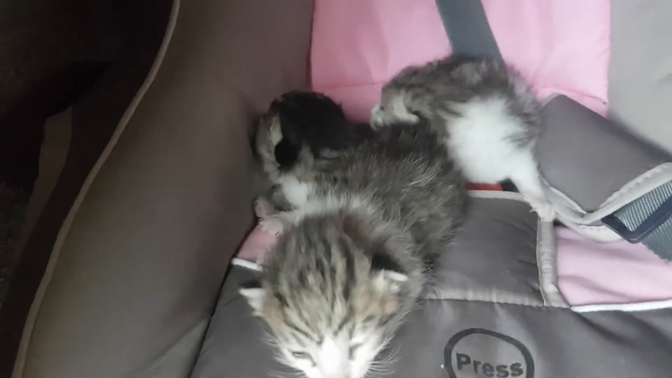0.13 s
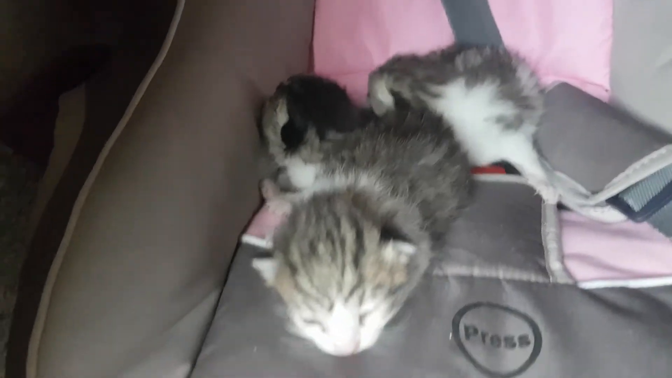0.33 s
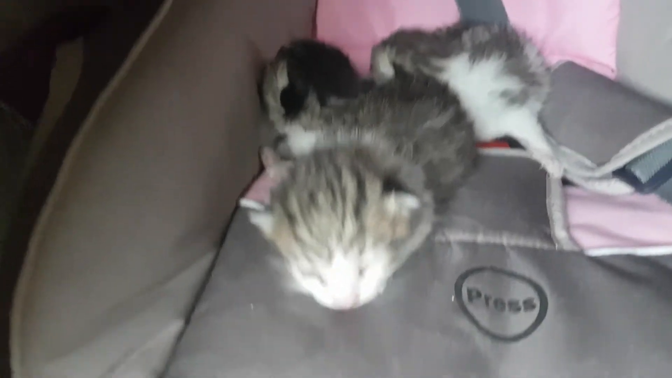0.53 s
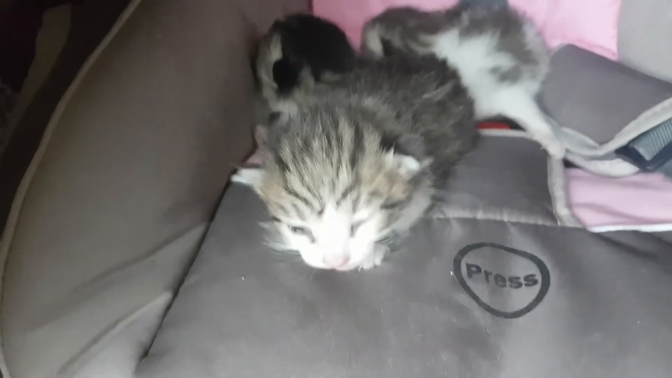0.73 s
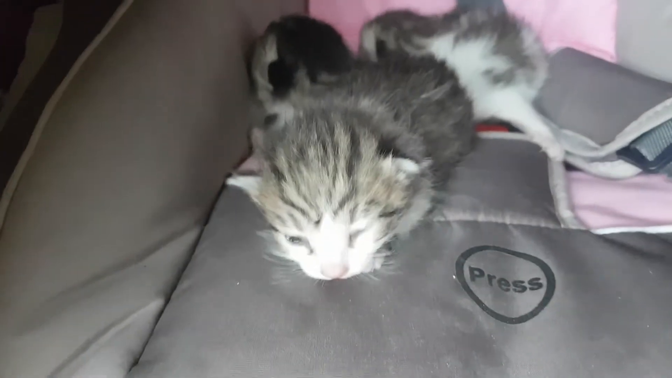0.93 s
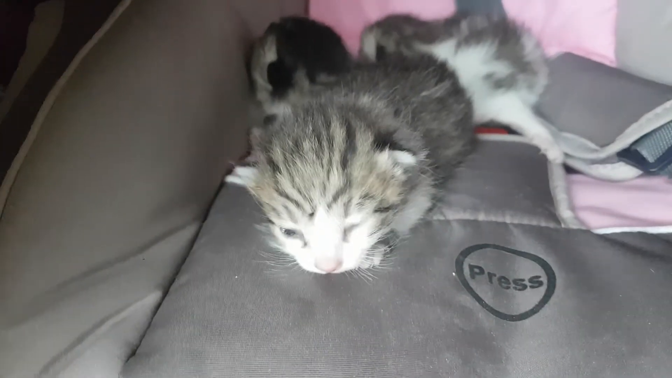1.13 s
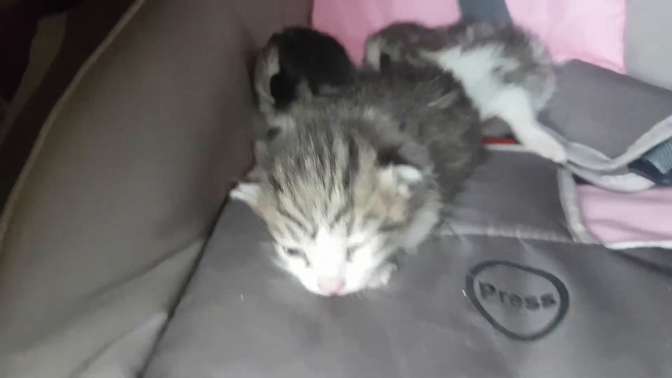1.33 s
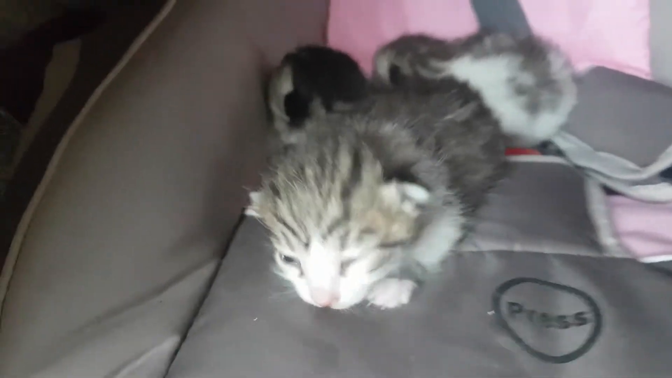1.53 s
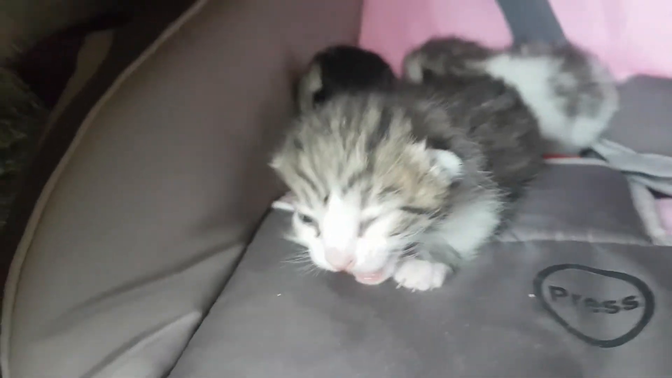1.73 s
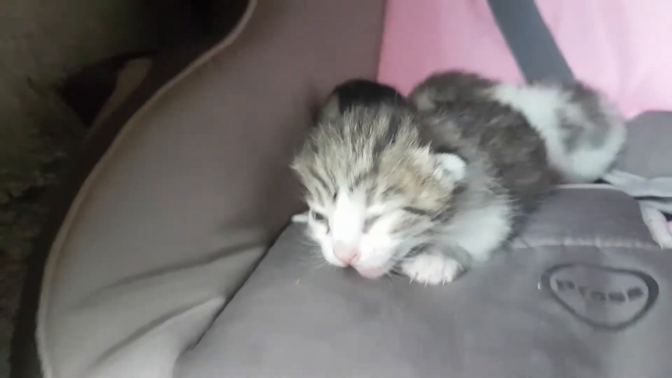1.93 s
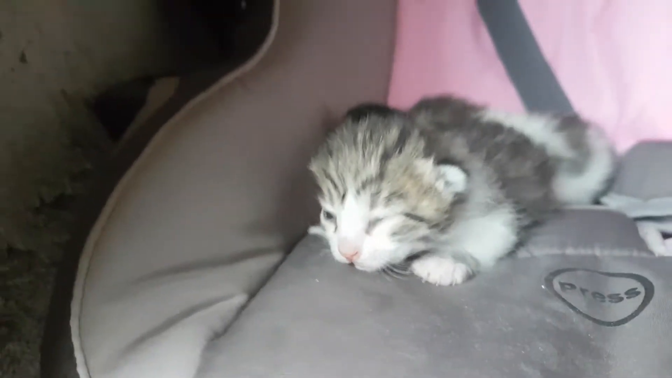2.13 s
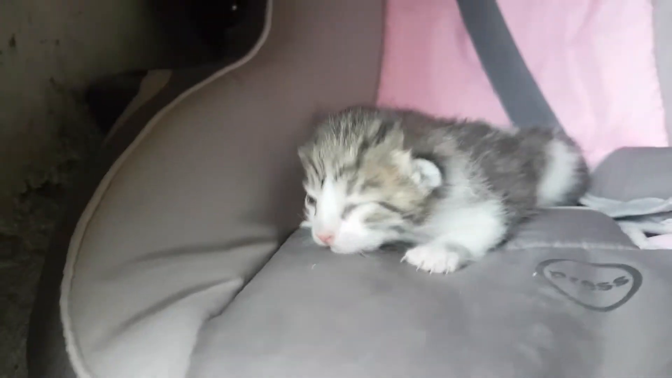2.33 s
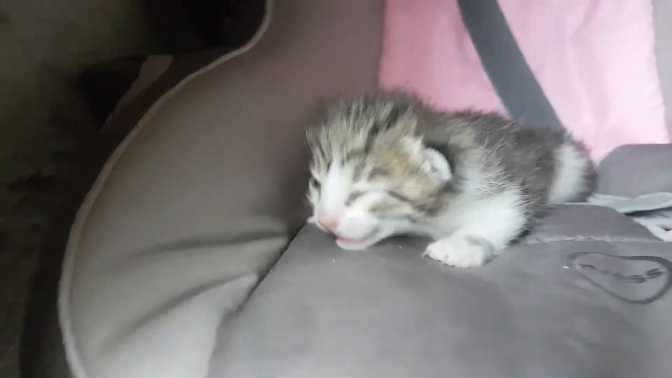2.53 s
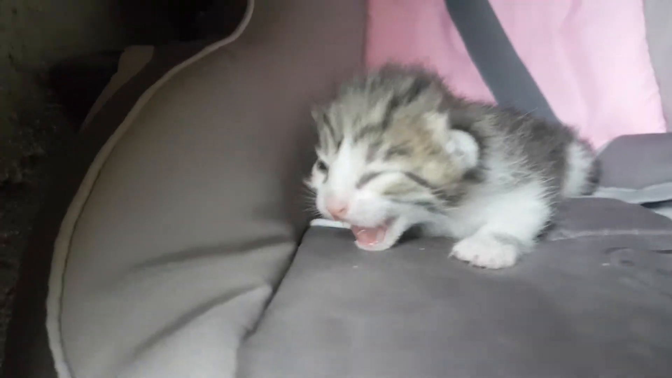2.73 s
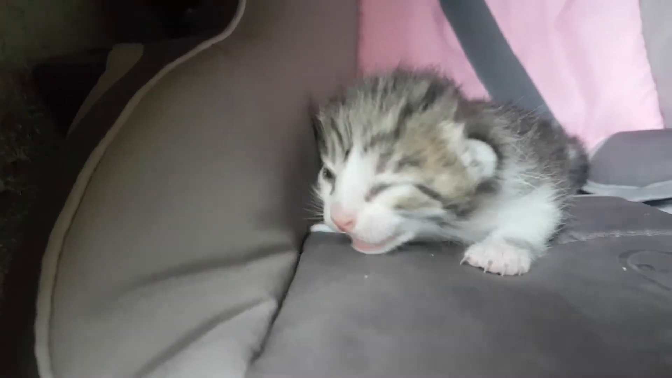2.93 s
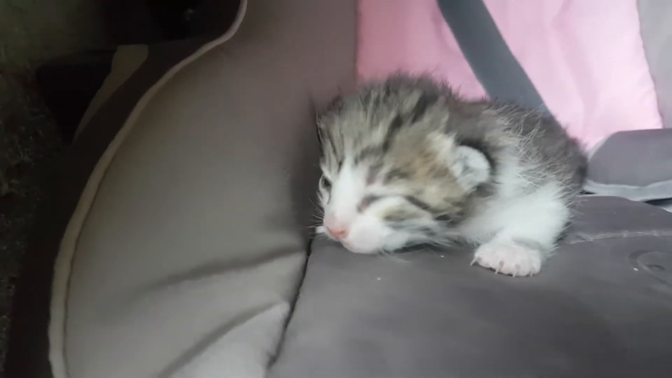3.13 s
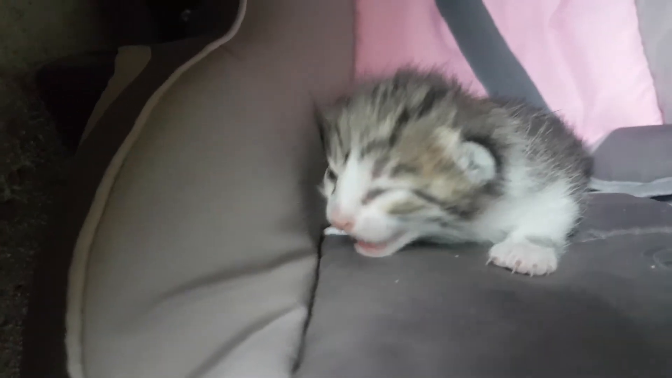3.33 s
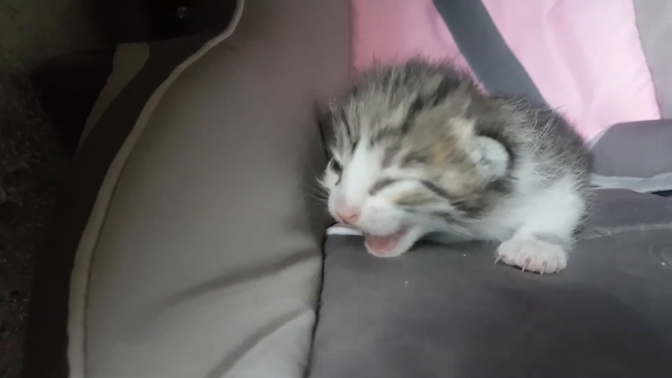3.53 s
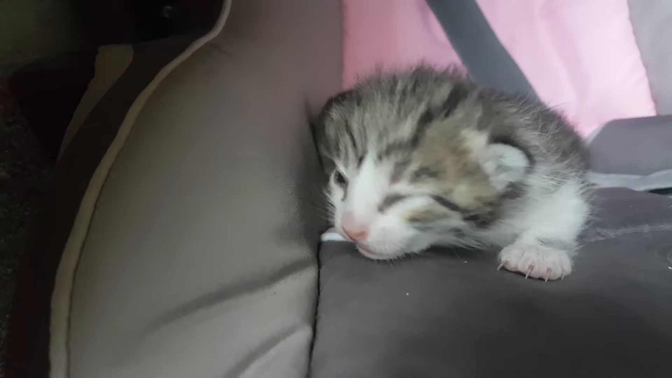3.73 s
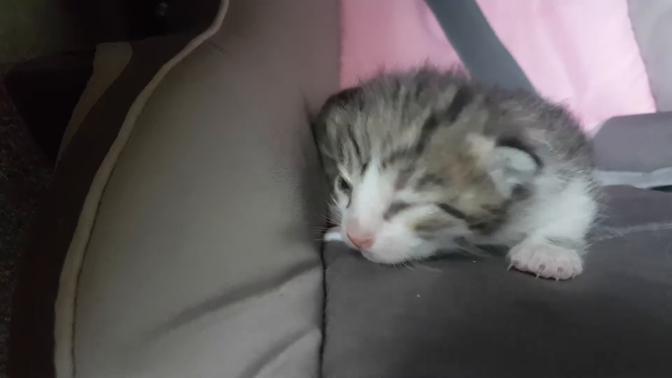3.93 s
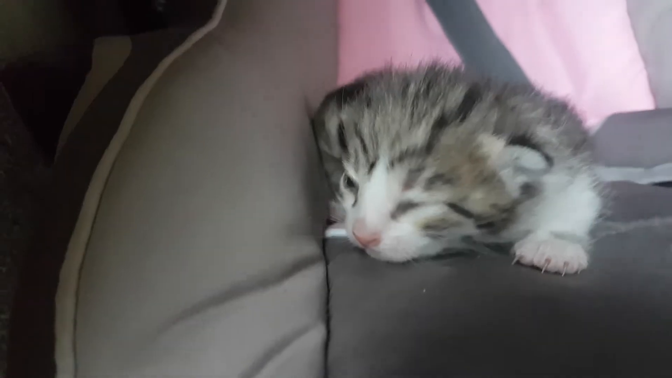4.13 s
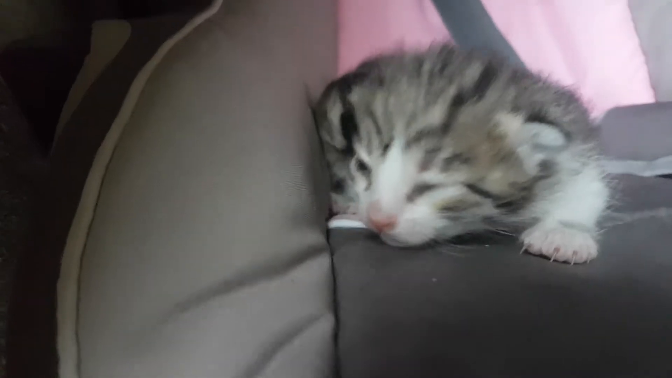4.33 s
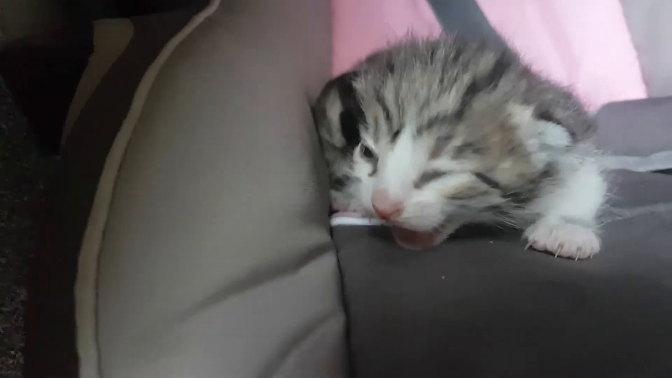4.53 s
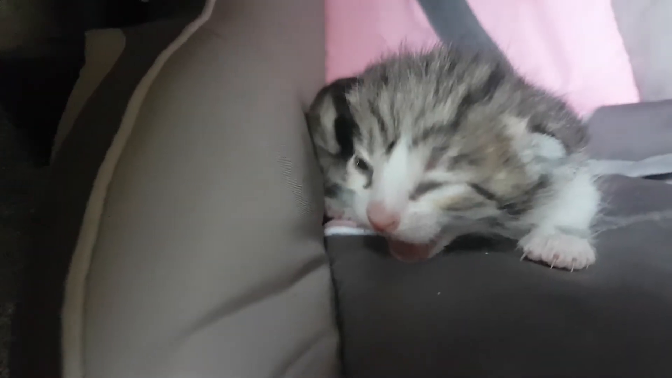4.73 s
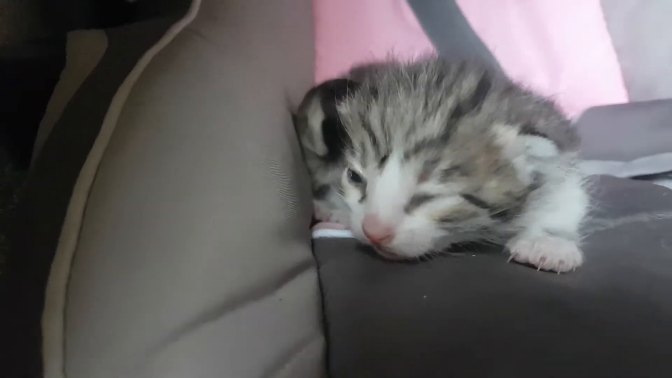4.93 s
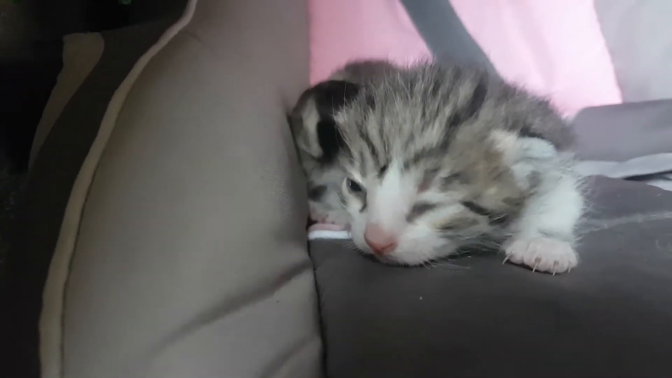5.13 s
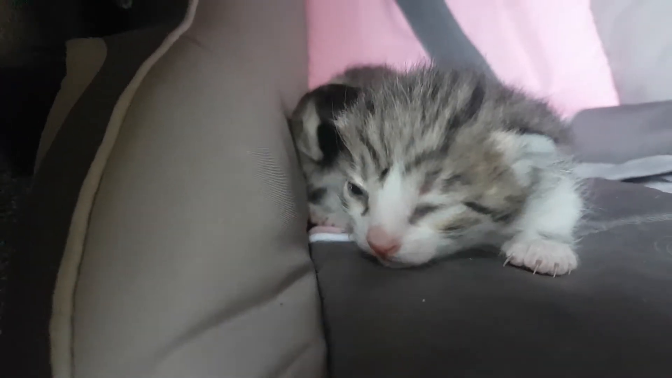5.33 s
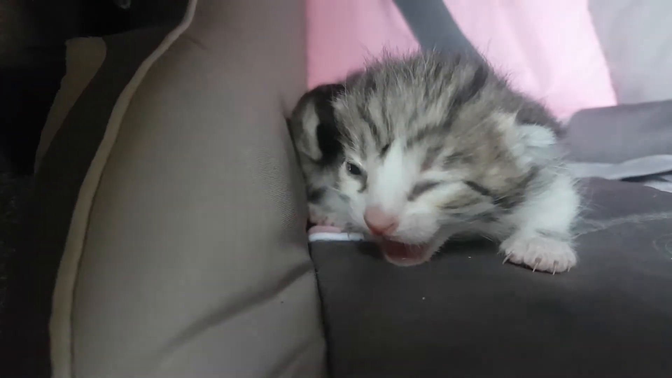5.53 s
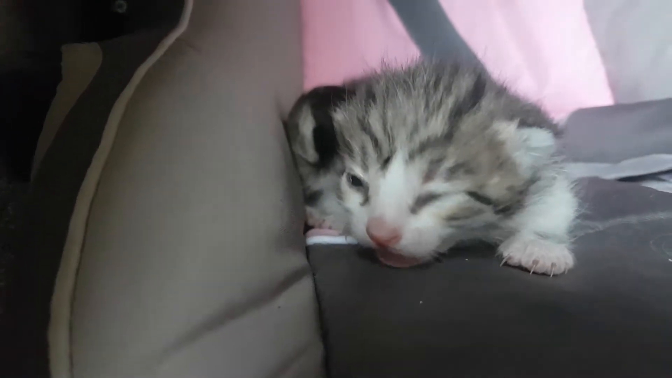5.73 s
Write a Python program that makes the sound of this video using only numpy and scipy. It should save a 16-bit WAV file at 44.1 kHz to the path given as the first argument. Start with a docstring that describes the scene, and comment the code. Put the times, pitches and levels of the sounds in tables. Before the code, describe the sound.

A newborn kitten close by gives six piercing, squeaky mews about a second apart, while fainter littermates answer behind in a quiet room.

```python
"""A newborn kitten mews close to a phone: a thin rise, a break of register, a bright falling cry.
Each cry is a stack of harmonics with air noise riding on it; litter mates answer the same way behind it.
Sines add a brief half-pitch tone of the kitten's voice, strongest at its 3rd harmonic, and faint steady
tones. Noise clicks make smacking lips and claws, a pressure step is one finger tap on the left port.
The half covered right port is shaded and late; shaped noise makes the quiet room."""
import sys
import numpy as np
from scipy import signal
from scipy.fft import rfft, irfft, next_fast_len
from scipy.io import wavfile
from scipy.ndimage import uniform_filter1d, map_coordinates

SR = 44100
rng = np.random.default_rng(int(sys.argv[2]) if len(sys.argv) > 2 else 0)


def store_pcm(level_fs):
    """Save levels as 16-bit WAV."""
    pcm = np.round(np.clip(level_fs, -1, 1) * 32767).astype(np.int16)
    wavfile.write(sys.argv[1], SR, np.atleast_2d(pcm).T)


N = 259308
TOP_HZ = 15850  # band limit of the phone


def amp(db):
    """Gain of a dB value."""
    return 10 ** (np.asarray(db) / 20)


def unit(x):
    """x at rms 1."""
    return x / np.sqrt(np.mean(x ** 2) + 1e-20)


def ramp(x):
    """x held between 0 and 1."""
    return np.clip(x, 0, 1)


def along(points, hz):
    """Interpolate (Hz, value) points on a log frequency axis."""
    f, v = np.transpose(points)
    return np.interp(np.log(hz + 1), np.log(f + 1), v)


def wobble(rate, size=N):
    """A smooth random curve, rate knots a second."""
    knots = rng.standard_normal(int(size * rate / SR) + 4)
    return map_coordinates(knots, [np.arange(size) * rate / SR])


def filtered(x, response):
    """x times a complex response of frequency."""
    m = next_fast_len(N + SR // 2)
    return irfft(rfft(x, m) * response(np.fft.rfftfreq(m, 1 / SR)), m)[..., :N]


# Near cries, one list a cry. Each row: time in seconds, pitch in Hz, fundamental in dB,
# mouth opening as 2nd harmonic over fundamental in dB.
NEAR_CRIES = [
    [(.549, 965, -52.5, -33), (.575, 1421, -35.5, -27), (.593, 1694, -44, -4), (.615, 1957, -38.5, 7.5),
     (.62, 2269, -27, -26), (.644, 2210, -29, -10.5), (.651, 1680, -35, 19), (.673, 1684, -29, 12.5),
     (.684, 1621, -29, 18), (.769, 1498, -24.5, 9.5), (.81, 1436, -28.5, 0.5), (.843, 1429, -34.5, 1.5),
     (.87, 1340, -42, 19), (.911, 904, -51, -15)],
    [(1.553, 915, -53, -10), (1.595, 1332, -39.5, -32.5), (1.625, 1594, -38.5, -4), (1.648, 1602, -34.5, 4),
     (1.661, 1482, -31.5, 12.5), (1.696, 1520, -28.5, 17), (1.733, 1563, -30, 18.5),
     (1.778, 1496, -26.5, 18.5), (1.815, 1431, -23, 10), (1.875, 1287, -33, 10), (1.892, 1264, -40.5, 13.5),
     (1.933, 918, -46.5, -4.5)],
    [(2.534, 926, -50.5, -30), (2.568, 1384, -38, -36.5), (2.604, 1705, -33.5, -12),
     (2.635, 1703, -28.5, -10), (2.652, 1510, -31, 12), (2.724, 1536, -22.5, 13.5),
     (2.773, 1483, -23.5, 3.5), (2.82, 1389, -23.5, 5), (2.885, 1227, -31.5, 3.5), (2.897, 1158, -35, 5),
     (2.924, 886.5, -44.5, 3)],
    [(3.313, 1000, -41, -32), (3.337, 1438, -42, -18), (3.381, 1836, -24.5, -22), (3.386, 2345, -19, -31.5),
     (3.405, 2280, -19.5, -27.5), (3.416, 2100, -23, -27.5), (3.425, 1569, -25.5, 10),
     (3.447, 1553, -23, 8.5), (3.504, 1522, -23, 11.5), (3.566, 1410, -21, 3.5), (3.592, 1356, -25, 9.5),
     (3.64, 1280, -31.5, 10.5), (3.68, 862, -44.5, 1)],
    [(4.413, 1283, -42.5, -20.5), (4.437, 1746, -24.5, -41.5), (4.45, 1988, -20, -30.5),
     (4.466, 2022, -19.5, -19.5), (4.474, 1649, -24.5, 11), (4.557, 1627, -19.5, 10.5),
     (4.62, 1568, -17.5, 6.5), (4.665, 1499, -17, 1), (4.695, 1360, -21, 8), (4.712, 1312, -23, 10),
     (4.744, 1344, -23, 8), (4.785, 1157, -32, 12.5), (4.806, 1022, -39.5, 2), (4.838, 773, -43.5, 2)],
    [(5.365, 1092, -36.5, -20.5), (5.391, 1563, -33.5, -12.5), (5.418, 1695, -26, -7),
     (5.43, 1687, -24.5, -8), (5.436, 1554, -30, 11.5), (5.452, 1505, -28, 15.5), (5.521, 1541, -20.5, 9.5),
     (5.561, 1508, -19.5, 8), (5.605, 1353, -21, 6), (5.64, 1382, -25, 7.5), (5.666, 1239, -29, 13),
     (5.677, 1274, -29.5, 5.5), (5.718, 841, -41.5, 3.5)],
]
# Course of each near cry. Each row: lips part in seconds, voice is full in seconds, upper harmonics' peak
# in dB, 3rd harmonic over them in dB, base level of throat air in dB, right port gain before shading
# in dB, gain of harmonics above 9 kHz and of mouth hiss in dB.
NEAR_TURNS = [(0.586, 0.652, -30.5, 3.5, -51, 1.5, -2), (1.617, 1.664, -29, 4.5, -51.5, -0.5, -2.5),
              (2.585, 2.647, -28.5, 6.5, -56.5, -2.5, 2.5), (3.342, 3.424, -24.5, -4, -48, -4.5, -3.5),
              (4.42, 4.473, -26.5, -2.5, -47.5, -3, 2), (5.39, 5.434, -25.5, -9, -46.5, -2, 4.5)]
# Near harmonics from the 4th up. Each row: frequency in Hz, gain in dB.
NEAR_UPPER = [(2500, 2), (4500, -1), (6200, 5.5), (8000, -1), (9500, -13), (11000, -24), (12500, -25.5),
              (14000, -17.5), (15500, -8.5)]
# Folds alternate strong and weak cycles. Each row: start in seconds, end in seconds, depth as a ratio.
ALTERNATING = [(.588, .615, .5), (3.348, 3.382, 1.5), (4.468, 4.49, .25), (5.405, 5.435, .3),
               (5.525, 5.56, .2), (5.672, 5.7, .5), (.852, .885, .12), (1.885, 1.915, .15)]
THIN_DB = 10  # overtones are thin before the near kitten's break
RASP = .0025  # cycle unevenness, grows with harmonic number squared


def near_kitten():
    """The main voice: pitch flicks up as each cry closes, and the folds sometimes alternate."""
    return cries([flicked(c) for c in NEAR_CRIES], NEAR_TURNS, NEAR_UPPER, ALTERNATING, THIN_DB,
                 hiss_db=-23.5, jitter=0.0027, flutter_db=1.14, rasp=RASP, smooth_samples=90)


FLICK_S, FLICK_RATIO, FLICK_DB = 0.015, 1.6, -6


def flicked(rows):
    """The folds snap apart: a last upward flick of pitch, dying away."""
    s, hz, db, opening_db = rows[-1]
    return rows + [(s + FLICK_S, hz * FLICK_RATIO, db + FLICK_DB, opening_db + FLICK_DB)]


# Litter mates' cries, one list a cry. Each row: time in seconds, pitch in Hz, fundamental in dB,
# 2nd harmonic over fundamental in dB.
MATE_CRIES = [
    [(0, 1155, -48.5, -14), (.04, 1230, -50, -4), (.081, 1256, -51, -5.5), (.138, 1143, -49, -7.5),
     (.183, 959, -58, -25), (.21, 736, -57, -6)],
    [(1.976, 457, -64, 9.5), (2.04, 971, -58, -14.5), (2.065, 1085, -52, -22), (2.143, 1209, -60, -6.5),
     (2.22, 1286, -55.5, -7), (2.281, 1276, -51.5, -16.5), (2.35, 1112, -52, -9.5), (2.439, 887, -60, -5.5)],
    [(2.691, 507, -56.5, -3), (2.802, 959.5, -58.5, -7), (2.863, 1097, -56, -5), (2.918, 1176, -51.5, 2),
     (2.972, 1240, -59, 1.5), (3.043, 1156, -52, -11), (3.117, 1005, -48.5, -17.5), (3.174, 784, -61, -1)],
    [(4.021, 580.4, -51, -5), (4.05, 1061, -50.5, -15), (4.087, 1460, -51.5, -4.5),
     (4.117, 1439, -58.5, -1), (4.152, 1826, -51.5, 1.5), (4.192, 1987, -46, -4), (4.267, 1947, -40.5, -15),
     (4.289, 1949, -37, -18), (4.331, 1829, -33, -23), (4.363, 1600, -37, -4.5), (4.42, 1607, -38.5, -7.5),
     (4.493, 1442, -49, -8), (4.539, 994, -55, -7.5)],
    [(4.855, 1040, -47.5, -28.5), (4.882, 1406, -51.5, -3), (4.954, 1752, -51, -5), (5.003, 1967, -37.5, 5),
     (5.029, 1944, -38.5, -5), (5.047, 1892, -34.5, -15), (5.072, 1694, -37, -10.5),
     (5.13, 1618, -37, -14.5), (5.15, 1488, -34.5, -1.5), (5.175, 1441, -34, -0.5),
     (5.222, 1402, -39, -1.5), (5.268, 1466, -33.5, -8.5), (5.292, 1419, -40.5, -8),
     (5.322, 1336, -44, -2.5), (5.359, 1065, -41, -17.5)],
]
# Course of each mate's cry. Each row: lips part in seconds, voice is full in seconds, upper harmonics' peak
# in dB, 3rd harmonic over them in dB, base level of throat air in dB, right port gain before shading
# in dB, gain of harmonics above 9 kHz and of mouth hiss in dB.
MATE_TURNS = [(-.04, 0.061, -68, 1.5, -80, 0.57, 2), (2.085, 2.19, -75.5, 2, -91, 1, -1),
              (2.8, 2.95, -78, -3.5, -84, .8, 1), (4.083, 4.138, -54.5, -3.5, -69, -0.11, -9),
              (4.868, 4.919, -56.5, 2.5, -66, -0.72, -4)]
# Mates' harmonics from the 4th up. Each row: frequency in Hz, gain in dB.
MATE_UPPER = [(2500, -12.5), (5000, -7), (7000, -0.5), (9500, -1.5), (11500, 1.5), (13500, -1), (15500, -8)]


def litter_mates():
    """Answering voices: the same harmonic stack with smoother pitch and fainter hiss."""
    return cries(MATE_CRIES, MATE_TURNS, MATE_UPPER, [], 0,
                 hiss_db=-34, jitter=0.0029, flutter_db=2.1, rasp=RASP, smooth_samples=900)


SHUT_DB, PART_S = 22, .004  # closed lips muffle the overtones until they part
SWELL_DB, BREAK_S = 15, .006  # swell until full voice; length of the break
TIRES_DB, TIRES_BENDS = 21, 1.68  # loss from the break to the end, slow at first
CLOSE_DB, CLOSE_S = 30, .065  # the mouth closes


def brightness(t, part_s, break_s, thin_db):
    """Level of the overtones through a cry, in dB under their peak."""
    shut = SHUT_DB * ramp((part_s - t) / PART_S)
    thin = thin_db * ramp((break_s - t) / BREAK_S)
    swell = SWELL_DB * ramp((break_s - t) / (break_s - part_s))
    tired = TIRES_DB * ramp((t - break_s) / (t[-1] - break_s)) ** TIRES_BENDS
    closing = CLOSE_DB * ramp(1 - (t[-1] - t) / CLOSE_S)
    return -shut - thin - swell - tired - closing


# Throat resonances on the 3rd harmonic. Each row: frequency in Hz, gain in dB.
THIRD_COLOUR = [(2700, 16), (3800, 0.5), (5200, -.5), (6600, 7)]
FALSETTO_HZ, FALSETTO_DB = 2080, 14  # above this pitch the folds no longer close: upper harmonics drop


def cries(tables, turns, upper_colour, alternating, thin_db, hiss_db, jitter, flutter_db, rasp,
          smooth_samples):
    """Harmonic stacks on a moving pitch, plus air noise, for the left and right port."""
    out = np.zeros((2, N))
    for rows, turn in zip(tables, turns):
        part_s, break_s, peak_db, third_db, air_db, right_db, top_db = turn
        s, *cols = np.transpose(rows)
        first = round(max(s[0], 0) * SR)
        t = np.arange(first, round(s[-1] * SR)) / SR
        hz, level_db, opening_db = [np.interp(t, s, c) for c in cols]
        age = (t - t[0]) / (t[-1] - t[0])
        bright_db = brightness(t, part_s, break_s, thin_db)
        upper_db = peak_db + bright_db - FALSETTO_DB * ramp((hz - FALSETTO_HZ) / 100)
        hz = uniform_filter1d(hz, size=smooth_samples)  # the folds change tension smoothly
        third_level_db = peak_db + bright_db + third_db + along(THIRD_COLOUR, 3 * hz)
        low_db = (level_db, level_db + opening_db, third_level_db)
        cycles = np.cumsum(hz * (1 + jitter * wobble(150, size=len(t)))) / SR
        depth = sum((d * ramp(np.minimum(t - a, b - t) / 0.01) for a, b, d in alternating), 0 * t)
        alternate = 1 + depth * np.cos(np.pi * cycles)  # puts lines halfway between the harmonics
        uneven = wobble(810, size=len(t))
        tiring = 1 + .27 * age ** 1.5 * wobble(170, size=len(t))  # flutter as the breath runs out
        voice = np.zeros((2, len(t)))
        for k in range(1, 17):
            if k * hz.min() > TOP_HZ:
                break
            if k < 4:
                rel_db = low_db[k - 1]
            else:
                rel_db = upper_db + along(upper_colour, k * hz) + top_db * (k * hz > 9000)
            # higher harmonics are less steady
            rel_db = rel_db + flutter_db * min(k, 5) / 2 * wobble(45.43, size=len(t))
            # each partial reaches the right port by its own path
            sides = amp([0 * t, 0.89 * wobble(11, size=len(t))])
            sides = sides * (1 + rasp * k * k * (.5 + 2 * age) * uneven)  # blurs the high lines
            if k > 1:
                sides = sides * tiring
            if k > 2:
                sides = sides * alternate
            drift = np.array([0 * t, .07 * wobble(22, size=len(t))])
            tone = np.sin(2 * np.pi * (k * cycles + rng.random() + drift))
            voice += np.sqrt(2) * sides * amp(rel_db) * (k * hz < 17000) * tone
        throat_db = air_db + throat_rise_db(t, age, bright_db, depth, break_s)
        mouth_db = hiss_db + top_db + HISS_GROWS * (peak_db + bright_db)
        voice += air_noise(cycles, throat_db, mouth_db)
        edge = ramp(np.minimum(t - t[0], t[-1] - t) / 0.0012)
        out[:, first:first + len(t)] += voice * edge * amp([[0], [right_db]])
    return out


BURST_DB, BURST_S = 5.5, 0.018  # a puff of air at the break
AIR_GROWS = 0.35  # dB of air per dB of overtones
ROUGH_AIR_DB, TIRED_AIR_DB = 11.5, 5.5  # extra air while the folds alternate, and by the end


def throat_rise_db(t, age, bright_db, depth, break_s):
    """Throat air follows the overtones, age, roughness and the break."""
    burst = BURST_DB * np.exp(-((t - break_s) / BURST_S) ** 2)
    return TIRED_AIR_DB * age + AIR_GROWS * bright_db + ROUGH_AIR_DB * np.sqrt(np.abs(depth)) + burst


# Air noise through the throat. Each row: frequency in Hz, density in dB per Hz.
THROAT_AIR = [(300, -28), (1300, -17.5), (2000, -10.5), (2600, 1), (3000, 2.5), (3600, -31), (5600, -26),
              (6800, -1), (8500, -14), (10500, -27.5), (12000, -42.5)]
# Hiss past the open mouth. Each row: frequency in Hz, density in dB per Hz.
MOUTH_HISS = [(6000, -30), (7800, -10), (9500, -11), (11200, -18), (12500, -5), (14000, -1), (15800, -2)]
HISS_GROWS, GUSTY_DB = .68, 3  # dB of hiss per dB of overtones; the air comes unevenly


def air_noise(cycles, throat_db, mouth_db):
    """Turbulent air in throat and mouth, bursting once a cycle."""
    n = len(cycles)
    f = np.fft.rfftfreq(n, 1 / SR)
    throat, mouth = [unit(irfft(rfft(rng.standard_normal(n)) * amp(along(c, f)), n))
                     for c in (THROAT_AIR, MOUTH_HISS)]
    noise = amp(throat_db) * throat + amp(mouth_db) * mouth
    return noise * amp(GUSTY_DB * wobble(35, size=n)) * (1 + 0.3 * np.cos(2 * np.pi * cycles))


# Half-pitch tone of the kitten's voice (first row) and faint steady tones. Each row: centre in seconds,
# frequency in Hz, level in dB, length in seconds, 3rd harmonic over it in dB.
ADDED_TONES = [(3.372, 900, -41, .025, 11), (1.42, 620, -55, .04, -30), (5.69, 600, -50, .03, -30),
               (.84, 470, -61, .14, -30), (2.3, 292, -63, 1.7, -30), (4.3, 470, -63, .45, -30)]


def added_tones():
    """Fixed-pitch sines with a 3rd harmonic, each under a raised-cosine swell."""
    out = np.zeros(N)
    for s, hz, db, length_s, third_db in ADDED_TONES:
        t = np.arange(round(length_s * SR)) / SR
        tone = np.sin(2 * np.pi * hz * t) + amp(third_db) * np.sin(2 * np.pi * 3 * hz * t)
        out[round((s - length_s / 2) * SR):][:len(t)] += amp(db) * np.hanning(len(t)) * tone
    return out


# Lips and claws. Each row: start in seconds, treble level in dB, body over treble in dB.
SMACK_CLICKS = [(0.2533, -58, 2.5), (0.5508, -64, 3), (1.0567, -67, 3.5), (1.0715, -67, -14.5),
                (1.1556, -64, -5), (1.162, -73, 11.5), (1.2271, -60, 12.5), (1.234, -73, 9.5),
                (1.3468, -55.5, -3), (1.4146, -57, 3.5), (1.6107, -43, -9), (2.3082, -54, -22),
                (2.5684, -55, -15), (2.577, -38, -18), (3.3367, -40, -17.5), (4.0887, -48.5, -5.5),
                (4.4159, -35.5, -20), (5.057, -49.5, -18), (5.384, -48.5, -17.5), (5.389, -43.5, -18.5)]


def smacks():
    """Noise clicks decaying 60 dB in 6 ms, with a treble and a body band."""
    high, body, t = np.zeros(N), np.zeros(N), np.arange(300) / SR
    for s, db, body_db in SMACK_CLICKS:
        click = rng.standard_normal(len(t)) * amp(9 - 60 * t / .006)  # each band keeps part of the peak
        high[round(s * SR):][:len(t)] += amp(db) * click
        body[round(s * SR):][:len(t)] += amp(db + body_db) * click
    treble = filtered(high, lambda f: f > 7000)
    return treble + filtered(body, lambda f: (f > 2000) & (f < 7000))


# Cushion reflections. Each row: frequency in Hz, gain in dB.
CUSHION_ECHO = [(500, 8.5), (2700, 6), (4000, 9.5), (8000, -12.5), (16000, -31.5)]
# Left port over right, near sounds. Each row: frequency in Hz, difference in dB.
NEAR_SHADOW = [(60, 16.5), (92, 22.5), (140, 14.5), (210, 14), (330, 13.5), (500, 9), (770, 17), (1170, 20),
               (1790, 20), (2740, 15.5), (4190, 10.5), (6410, 16), (9810, 15), (15000, 22)]
# Left port over right, litter mates. Each row: frequency in Hz, difference in dB.
MATE_SHADOW = [(60, 14.5), (110, 19), (200, 2.5), (380, 12.5), (700, 17.5), (1290, 17.5), (2380, 8),
               (4400, 12.5), (8120, 17), (15000, 16)]


def ports(x, shadow, lag_s, echo_db):
    """The right port hears the sound later and shaded; cushions give a short answer."""
    t = np.arange(SR // 6) / SR
    tail = rng.standard_normal((2, len(t))) * amp(-60 * t / 0.21)
    wet = signal.fftconvolve(x, tail / np.linalg.norm(tail[0]), axes=1)[:, :N]
    left, right = x + amp(echo_db) * filtered(wet, lambda f: amp(along(CUSHION_ECHO, f)))
    shaded = filtered(right, lambda f: amp(-along(shadow, f)) * np.exp(-2j * np.pi * f * lag_s))
    return np.array([left, shaded])


# Finger tap: start in seconds, level in dB.
FINGER_TAP = (0.50695, 0.55)


def tap():
    """A pressure step in the left port and its slower rebound."""
    out, t = np.zeros((2, N)), np.arange(SR // 10) / SR
    start_s, level_db = FINGER_TAP
    u = t / 0.0012
    step = np.exp(-t / 0.0015) * (1 - np.exp(-t / .00004))
    rebound = 0.33 * u ** 3 * np.exp(-u)
    sway = 0.04 * np.exp(-t / 0.017) * np.sin(2 * np.pi * 20 * t) ** 2  # the diaphragm settles
    out[0, round(start_s * SR):][:len(t)] = amp(level_db) * (step - rebound + sway)
    return uniform_filter1d(out, size=5, axis=1)  # the finger takes 0.1 ms to seal the port


# Room levels. Each row: time in seconds, rumble in dB, drone in dB, hum in dB.
ROOM_LEVELS = [(0, -37, -62, -58.5), (.3, -45.5, -67.5, -55), (.55, -53.5, -63, -53.5),
               (.85, -59.5, -63, -65.5), (1.8, -56.5, -57, -55), (2.1, -56.5, -61.5, -56.5),
               (2.7, -56.5, -58, -58), (3.4, -55, -57.5, -58.5), (3.65, -59.5, -52.5, -56.5),
               (4.5, -60.5, -58, -58.5), (4.85, -49, -48, -58.5), (5.1, -58, -60, -59),
               (5.88, -53, -63, -58.5)]
# Hiss level. Each row: time in seconds, level in dB.
HISS_LEVEL = [(0, -60.5), (.45, -62), (1.0, -68), (1.4, -58), (2.2, -58.5), (3.2, -63), (3.9, -63.5),
              (4.4, -58), (5, -61), (5.88, -65)]
# Spectra of the four layers. Each row: frequency in Hz, relative density in dB per Hz.
RUMBLE_SPECTRUM = [(8, -41.5), (20, -14.5), (40, 2.5), (55, 0.5), (68, -3.5), (90, -44.5), (200, -120)]
DRONE_SPECTRUM = [(40, -62), (68, -6.5), (92, 7), (115, -11), (140, -15), (190, -37.5), (350, -120)]
HUM_SPECTRUM = [(76, -40), (130, -5), (168, -2), (237, -9.5), (621, -16), (700, -16), (910, -41),
                (1540, -120)]
HISS_SPECTRUM = [(290, -38), (500, -13), (621, -18), (718, -6.5), (1160, -8.5), (1260, -9), (1480, -9),
                 (2610, -15), (5020, -24), (7860, -23), (8960, -29.5), (15100, -20), (16000, -30.5)]


def room():
    """Lumpy rumble of the hand and the house, a drone, a hum and a hiss, all shaped noise."""
    t = np.arange(N) / SR
    s, rumble_db, drone_db, hum_db = np.transpose(ROOM_LEVELS)
    rumble = bed(RUMBLE_SPECTRUM, np.interp(t, s, rumble_db) + 2.2 * wobble(5))
    drone = bed(DRONE_SPECTRUM, np.interp(t, s, drone_db) + 1.5 * wobble(51))
    hum = bed(HUM_SPECTRUM, np.interp(t, s, hum_db) + 1.9 * wobble(6))
    hiss = bed(HISS_SPECTRUM, np.interp(t, *np.transpose(HISS_LEVEL)) + 1.0 * wobble(10))
    return rumble + drone + hum + hiss


# Room noise at the right port. Each row: frequency in Hz, level against left in dB.
RIGHT_PORT_ROOM = [(60, -20), (200, -16.5), (700, -13.5), (1300, -10.5), (2400, -6), (4400, -6.5),
                   (15000, -12)]
# Left-right likeness. Each row: frequency in Hz, correlation from 0 to 1.
LIKENESS = [(60, 1), (290, .55), (640, 0.43), (1400, 0.07)]


def bed(spectrum, level_db):
    """Room noise: alike in the bass, nearly unrelated in the treble, weaker at the right port."""
    m = next_fast_len(N)
    f = np.fft.rfftfreq(m, 1 / SR)
    a, b = rfft(rng.standard_normal((2, m))) * amp(along(spectrum, f))
    like = ramp(along(LIKENESS, f))
    right = (like * a + np.sqrt(1 - like ** 2) * b) * amp(along(RIGHT_PORT_ROOM, f))
    pair = irfft([a, right], m)[:, :N]
    return amp(level_db) * pair / np.std(pair[0])


def scene():
    """Near kitten, litter mates, added tones, smacks, tap and room."""
    near = near_kitten() + added_tones() + smacks()
    near_heard = ports(near, NEAR_SHADOW, lag_s=.00009, echo_db=-23)
    mates_heard = ports(litter_mates(), MATE_SHADOW, lag_s=.00007, echo_db=-15.0)
    return near_heard + mates_heard + tap() + room()


def record(dry):
    """The phone keeps nothing above its band limit."""
    return filtered(dry, lambda hz: hz < TOP_HZ)


dry = scene()
out = record(dry)
store_pcm(out)
```